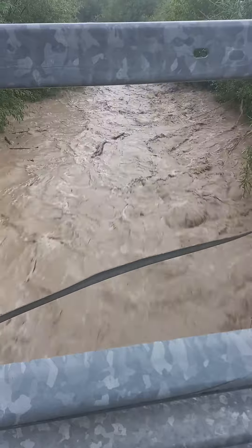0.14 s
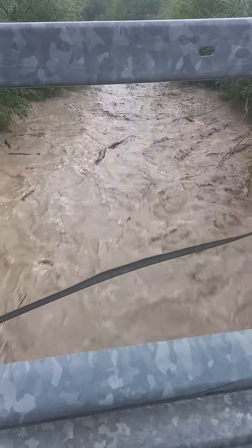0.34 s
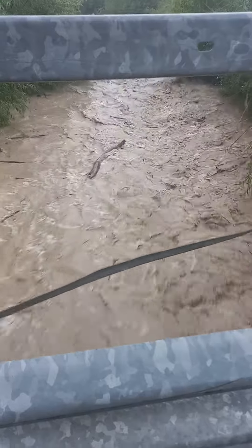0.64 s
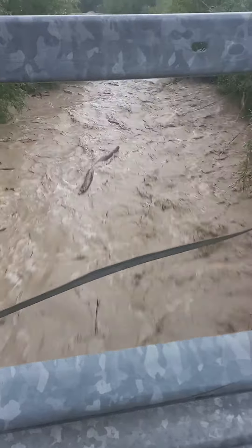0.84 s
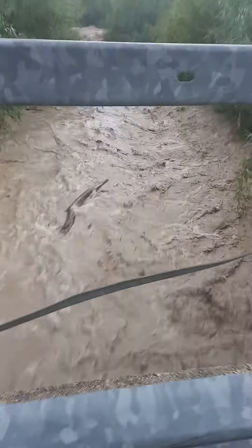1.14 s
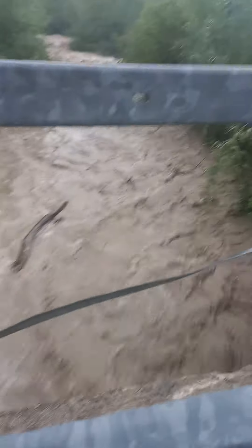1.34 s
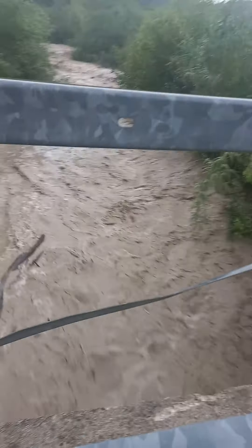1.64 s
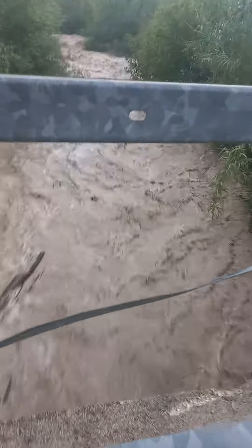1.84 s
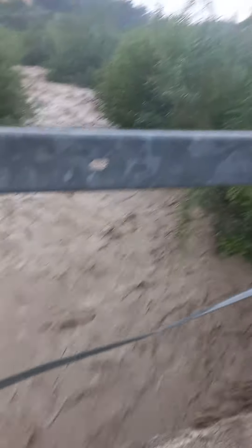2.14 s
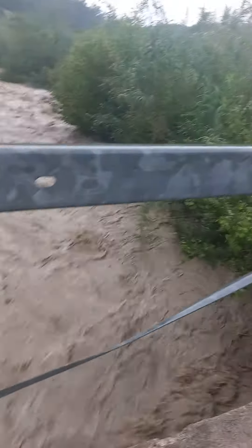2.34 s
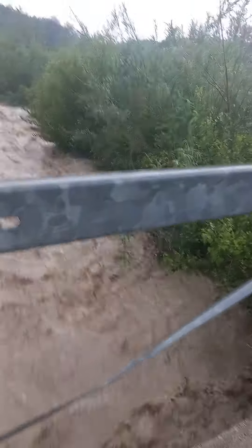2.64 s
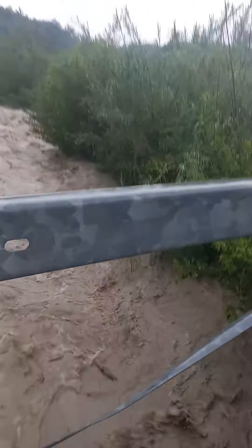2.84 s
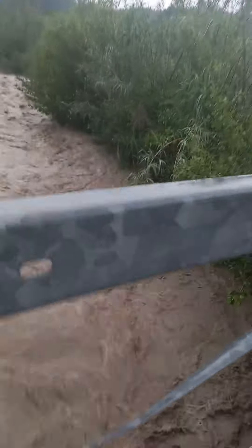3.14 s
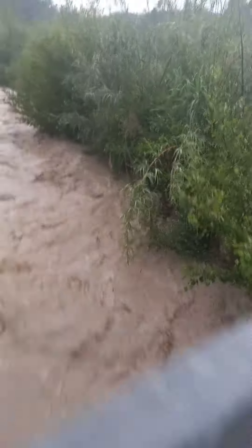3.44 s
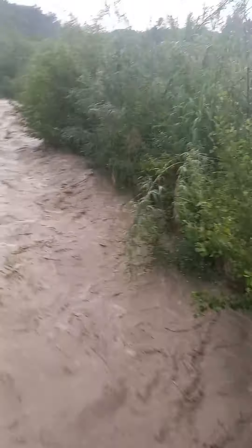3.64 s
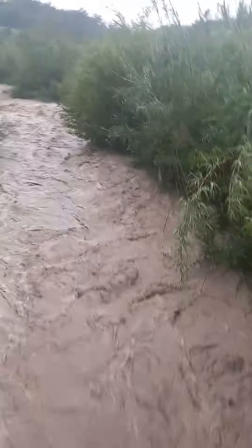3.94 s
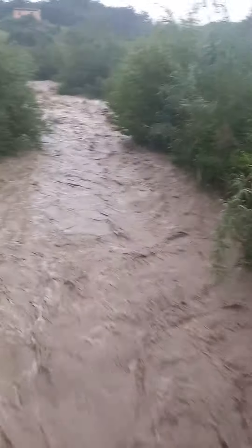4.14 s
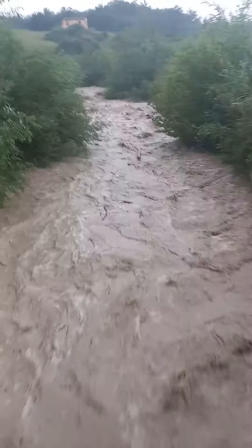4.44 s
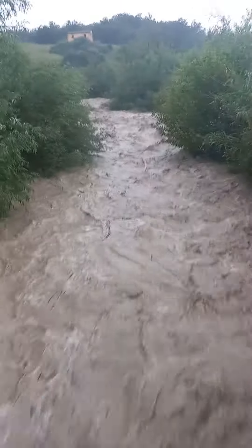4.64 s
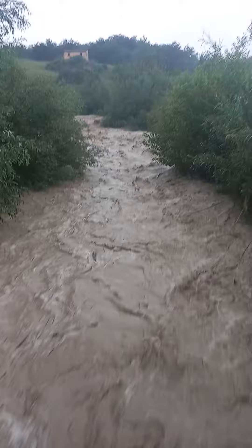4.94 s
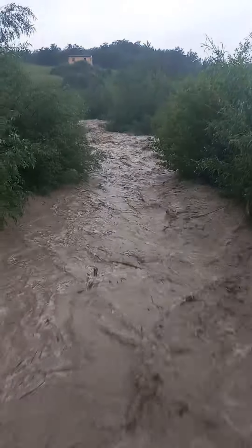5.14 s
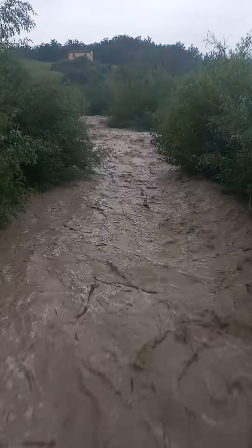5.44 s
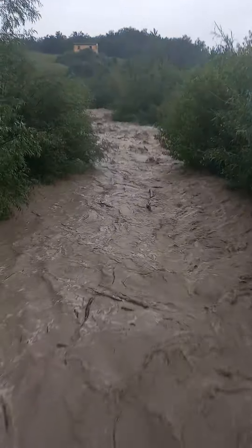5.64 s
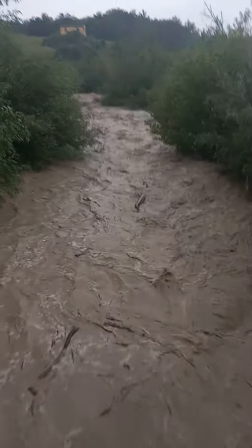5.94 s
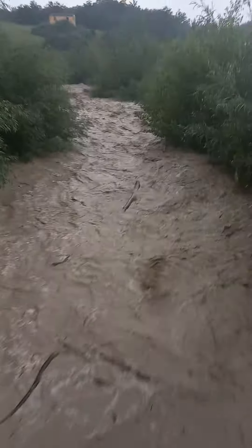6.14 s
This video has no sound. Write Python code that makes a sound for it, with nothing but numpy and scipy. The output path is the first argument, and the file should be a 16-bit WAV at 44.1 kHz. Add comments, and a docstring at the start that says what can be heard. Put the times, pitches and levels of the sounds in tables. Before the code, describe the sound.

A muddy torrent roars under a bridge for the whole six seconds or so, heard on a hand-held stereo microphone. A deep rumble and hollow churning sit in the centre, dotted with irregular dull thumps from stones and plunging water. Above them spreads the wide, bubbly splash of breaking crests, with a thin high hiss. A tiny, sharp, close tick comes at about 0.8 seconds, and a brief gush of spray on the right at 1.3. The splashing swells gradually until 3 seconds and stays full. From about 2.2 to 4.6 seconds the hollow tone of the roar shifts subtly as the microphone rises clear of the railing. A lower tick sounds at 4.9 seconds and a weaker gush at 5.4. The thumps cluster in the first second, around 3 to 4 seconds and again after 5. The water is still roaring at the end.

```python
"""A muddy torrent roars under a bridge, heard on a hand-held microphone pair. From the start, air pockets
and stones rumble and thump under the splash of breaking crests and a thin top hiss. A close tick at 0.8 s,
a gush of spray on the right at 1.3 s. The pair rises and turns; the splash swells until 3 s.
From 2.2 to 4.6 s the pair clears the rail and the roar's hollow resonances shift.
A lower tick follows at 4.9 s, a weaker gush at 5.4 s."""
import sys
import numpy as np
from scipy import signal
from scipy.fft import rfft, irfft
from scipy.io import wavfile
from scipy.ndimage import uniform_filter1d, minimum_filter1d

SR = 44100
rng = np.random.default_rng(int(sys.argv[2]) if len(sys.argv) > 2 else 0)


def transcribe(u):
    """Save the signal u as a 16-bit wav file named by the first command-line argument.

    u: samples, shape (n,) or (channels, n), limited to [-1, 1]; the rate is SR.
    q: integer samples, one column per channel.
    """
    v = np.clip(np.atleast_2d(u).T, -1, 1)
    q = np.round(v * 32767).astype(np.int16)
    wavfile.write(sys.argv[1], SR, q)


N = 277653

# Top hiss: t/s, level/dB, pan/dB (pan = left minus right throughout)
HISS_LEVELS = [(0, -50, 1.5), (.45, -49, 4), (.75, -44.5, -1.5), (1.05, -47.5, 3), (1.4, -49, 3),
               (1.6, -46, 7), (2.2, -47.5, 5), (2.4, -44.5, 1), (2.7, -44.5, 1), (3.1, -42, 1),
               (3.52, -43.5, -5), (3.7, -44, -1), (3.95, -42, -1.5), (4.3, -43, 0), (4.6, -43.5, 0),
               (4.95, -47.5, -1), (5.3, -46, -3.5), (5.75, -44.5, -1.5), (6.3, -44, 7.5)]
# Close ticks: t/s, peak/dB, low f/Hz, high f/Hz, decay/s, pan/dB
TICKS = [(.7764, -19, 14000, 16500, .0008, -4), (.7745, -34, 7600, 13500, .003, 0),
         (4.8605, -15, 2500, 3900, .0045, 0)]
# Spray gushes: t/s, level/dB, half width/s, pan/dB
GUSHES = [(1.344, -33, 0.042, -12), (5.443, -41, 0.039, -2)]
# Splash as the pair rises and turns: t/s, level/dB, pan/dB
SPLASH_LEVELS = [(0, -27, 2), (.88, -25, 2.5), (1.2, -25.5, 1.5), (1.45, -24.5, 0.5), (1.65, -23.5, 0),
                 (1.9, -23.5, 0), (2.25, -24, -.5), (2.5, -22.5, -1), (2.75, -22, -1), (2.95, -20.5, -0.5),
                 (3.2, -20.5, -1), (3.6, -22, -2), (4.0, -21.5, -.5), (4.7, -23, -1), (5.35, -22.5, -1.2),
                 (5.5, -21.5, 0), (5.82, -21.5, -0.5), (6.0, -22, -1.7), (6.3, -20.5, 0.5)]
# Splash brightness: t/s, tilt/(dB/octave)
SPLASH_TILT = [(0, -0.5), (.9, -0.5), (1.5, -0.6), (2.1, 0.2), (2.8, 0.35), (3.35, -0.04), (4.0, 0),
               (4.4, 0.8), (5.0, -0.3), (6.3, 0.2)]
# Thumps from the bed: t/s, peak/dB, f/Hz, length/s
THUMPS = [(0.068, -9, 171, 0.018), (0.237, -7.5, 157, 0.0054), (0.306, -6.5, 156, 0.016),
          (0.364, -9.5, 205, 0.011), (0.497, -10, 165, 0.012), (0.519, -6, 293, 0.0061),
          (0.54, -14, 150, 0.016), (0.723, -6.5, 133, 0.007), (0.862, -7, 258, 0.0086),
          (0.913, -13, 250, 0.0067), (0.93, -13, 140, 0.014), (0.99, -15, 150, 0.024),
          (1.027, -10.5, 125, 0.018), (1.239, -6, 150, 0.0078), (1.375, -20, 95.5, 0.025),
          (1.981, -21, 95, 0.03), (2.125, -8, 190, 0.011), (2.253, -19.5, 84, 0.037),
          (2.493, -13, 181, 0.017), (2.69, -18, 85, 0.044), (3.085, -17, 200, 0.0099),
          (3.114, -14, 327, 0.012), (3.136, -8.5, 253, 0.017), (3.303, -15, 253, 0.028),
          (3.326, -13, 235, 0.014), (3.335, -7.5, 143, 0.0086), (3.41, -10, 124, 0.015),
          (3.457, -9.5, 190, 0.0064), (3.53, -13, 245, 0.027), (3.566, -6, 127, 0.013),
          (3.562, -14, 275, 0.012), (3.605, -14.5, 290, 0.012), (3.736, -11, 374, 0.007),
          (3.87, -12.5, 260, 0.0062), (3.926, -13, 396, 0.0063), (4.087, -5.5, 208, 0.0058),
          (4.29, -19, 97, 0.03), (4.607, -12.5, 403, 0.0081), (4.732, -13.5, 156, 0.017),
          (4.956, -15.5, 98, 0.033), (5.017, -8, 310, 0.0053), (5.019, -15, 240, 0.016),
          (5.051, -12.5, 360, 0.009), (5.089, -14, 290, 0.02), (5.27, -10.5, 246, 0.018),
          (5.3, -17, 94.5, 0.028), (5.354, -13, 285, 0.017), (5.405, -15, 272, 0.013),
          (5.422, -8.5, 255, 0.011), (5.436, -14.5, 140, 0.014), (5.44, -6.5, 292, 0.0052),
          (5.779, -16, 264, 0.017), (6.122, -10.5, 103, 0.02), (6.125, -16, 322, 0.015),
          (6.166, -13.5, 91.6, 0.046), (6.222, -12.5, 337, 0.015)]
# Heave of the deep water: t/s, rumble level/dB, churn level/dB
DEEP_LEVELS = [(0, -18.5, -22), (.15, -19.5, -21.5), (.3, -23, -21), (.52, -22.5, -20), (.68, -25, -21),
               (.87, -22, -20), (1.08, -23.5, -21.5), (1.45, -21.5, -19), (1.7, -23, -20),
               (2.1, -21.5, -19.5), (2.55, -23, -20.5), (2.75, -23.5, -20.5), (3.0, -20.5, -19.5),
               (3.22, -21.5, -19.5), (3.35, -21, -17.5), (3.48, -22, -20), (3.58, -22, -20.5),
               (3.8, -22, -18.5), (4.1, -22.5, -19.5), (4.4, -21, -19.5), (4.7, -20.5, -19.5),
               (4.9, -20.5, -16), (5.02, -20.5, -19), (5.16, -20.5, -19), (5.33, -20, -20),
               (5.43, -18.5, -18), (5.56, -22, -19.5), (5.77, -18, -17.5), (5.98, -22, -19),
               (6.3, -22.5, -17.5)]
# Deep water, left-right likeness: f/Hz, coherence/1
DEEP_COHERENCE = [(30, .85), (70, 0.96), (130, 1), (290, 0.79), (500, 0.8), (700, 0.79), (1000, 0.64)]
# Churn position: t/s, pan/dB
CHURN_PAN = [(0, -1.5), (.5, -1.5), (1, 0), (2, -1), (6.3, -1)]
# Water noise spectra: f/Hz, relative density/dB
HISS_SPECTRUM = [(7000, -90), (8300, -40), (8900, -17), (9900, -11), (12500, -9.5), (13850, -13),
                 (14300, -6), (14900, -1), (16000, 0), (16600, -60)]
SPRAY_SPECTRUM = [(300, -76), (800, -32), (2200, 7), (4000, -6), (6500, 9), (7300, -26), (8000, -28),
                  (10000, -15), (13500, -8), (15000, 6), (16500, -12)]
SPLASH_SPECTRUM = [(150, -63), (400, -32), (750, 0.5), (1200, -3.5), (1600, -3.5), (2250, -4.5),
                   (2700, -10), (3300, -11), (5000, -12.5), (6550, -10.5), (6900, -17), (7300, -30.5),
                   (7800, -67), (9000, -110)]
CHURN_SPECTRUM = [(60, -74), (120, -37), (190, -4.5), (260, -1), (330, -3), (450, -5.5), (600, -9.5),
                  (680, -11), (760, -17.5), (1300, -60), (3000, -100)]
RUMBLE_SPECTRUM = [(20, -5.5), (84, 0), (110, 2.5), (160, 1.5), (220, -8.5), (320, -36), (600, -88)]
# Turn of the pair: t/s, left port lag/ms, splash coherence/1
MIC_TURN = [(0, 0, .1), (1.6, 0, .1), (2.2, .05, .1), (2.7, .26, .4), (3.5, .32, .3), (4.5, .25, .2),
            (6.3, .25, .18)]
# Hollow resonances at the rail: f/Hz, half width/Hz, gain behind/dB, gain clear/dB
RAIL_RESONANCES = [(280, 73, 0, 0.5), (390, 50, -0.5, 0), (560, 108, 3, -2), (2500, 360, 0.4, -0.3)]
# Port resonances: f/Hz, half width/Hz, gain before opening/dB, gain after/dB
LEFT_PORT = [(2030, 550, -0.64, -1), (4500, 1100, -0.034, 0.9)]
RIGHT_PORT = [(2160, 400, -1.8, 2.5), (3860, 430, 0.5, 1), (6300, 510, 1.5, -0.2), (11100, 2400, 2, -1),
              (15000, 1000, -1, 1)]
# Microphone low end: f/Hz, gain/dB
BASS_RESPONSE = [(20, -38), (32, -32), (50, -14), (62, -15), (72, -1), (84, 6), (97, -0.5), (130, 1.5)]

RAIL_CLEAR_START_S, RAIL_CLEAR_SPAN_S = 2.22, 2.35
RUMBLE_TILT_DB_OCT, CHURN_TILT_DB_OCT = (1, -2), (0, 2)  # each: behind the rail, clear of it
PORT_OPEN_START_S, PORT_OPEN_SPAN_S = 1.3, .3
NOTCH_HZ, NOTCH_HALF_WIDTH_HZ, NOTCH_DEPTH = 1806, 31, 0.53
LOWPASS_HZ = 15780
TIME_S, BINS_HZ = np.arange(N) / SR, np.fft.rfftfreq(N, 1 / SR)


def gain(db):
    return 10 ** (np.asarray(db) / 20)


def stereo_gain(db, pan_db):
    return gain([db + pan_db / 2, db - pan_db / 2])


def unit_rms(x):
    return x / np.sqrt(np.mean(x ** 2) + 1e-20)


def at_freq(table, hz):
    f, value = np.transpose(table)
    return np.interp(np.log(hz + 1), np.log(f + 1), value)


def at_time(table, t):
    times_s, *columns = np.transpose(table)
    return [np.interp(t, times_s, column) for column in columns]


def stft_grid(n_fft):
    """Bin f/Hz (column), frame t/s (row)."""
    return np.fft.rfftfreq(n_fft, 1 / SR)[:, None], np.arange(4 * N // n_fft + 5) * n_fft / 4 / SR


def water_noise(spectrum, coherence, patch_db, flicker_db, n_fft, tilt_db_oct=0):
    """Stereo noise, rms 1: drifting louder patches, all-band flicker, lag between the ports."""
    hz, t = stft_grid(n_fft)
    re1, im1, re2, im2, patches = rng.standard_normal((len(t), len(hz), 5)).T
    patches = uniform_filter1d(patches, size=5, axis=0)
    patches = unit_rms(uniform_filter1d(patches, size=6, axis=1))
    flicker = unit_rms(uniform_filter1d(rng.standard_normal(len(t)), size=3))
    lead = np.exp(2j * np.pi * hz * at_time(MIC_TURN, t)[0] / 1000)
    left, diffuse = re1 + 1j * im1, re2 + 1j * im2
    right = coherence * left * lead + np.sqrt(1 - coherence ** 2) * diffuse
    colour = gain(at_freq(spectrum, hz) + tilt_db_oct * np.log2((hz + 1) / 2500))
    colour /= np.sqrt((colour ** 2).mean(0))  # tilt leaves the level unchanged
    frames = np.array([left, right]) * colour * gain(patch_db * patches + flicker_db * flicker)
    return unit_rms(signal.istft(frames, nperseg=n_fft, noverlap=3 * n_fft // 4)[1][:, :N])


def resonate(sound, resonances, start_s, span_s):
    """Gaussian bands, each gliding from a first gain to a second."""
    spectrum, change = rfft(sound), 0
    progress = np.clip((TIME_S - start_s) / span_s, 0, 1)
    for hz, half_width_hz, first_db, last_db in resonances:
        band = irfft(spectrum * np.exp(-((BINS_HZ - hz) / half_width_hz) ** 2), N)
        change += (gain(first_db + (last_db - first_db) * progress) - 1) * band
    return sound + change


def top_hiss():
    """Thin hiss at the very top, independent left and right."""
    hiss = water_noise(HISS_SPECTRUM, coherence=0, patch_db=1.2, flicker_db=.8, n_fft=512)
    return stereo_gain(*at_time(HISS_LEVELS, TIME_S)) * hiss


def ticks():
    """Band-passed noise bursts that die at once."""
    out = np.zeros((2, N))
    for onset_s, peak_db, low_hz, high_hz, decay_s, pan_db in TICKS:
        burst = rng.standard_normal((2, N)) * (TIME_S > onset_s) * np.exp(-abs(TIME_S - onset_s) / decay_s)
        band = signal.sosfilt(signal.butter(4, [low_hz, high_hz], "band", fs=SR, output="sos"), burst)
        out += stereo_gain(peak_db, pan_db)[:, None] * band / abs(band).max(1, keepdims=True)
    return out


def gushes():
    """Brief bright swishes of spray."""
    swell = sum(stereo_gain(db, pan_db)[:, None] * np.exp(-abs((TIME_S - centre_s) / half_width_s) ** 3.1)
                for centre_s, db, half_width_s, pan_db in GUSHES)
    return swell * water_noise(SPRAY_SPECTRUM, coherence=.1, patch_db=1.5, flicker_db=1.5, n_fft=256)


def bubbles(rate_per_s, low_hz, high_hz, decay_cycles, spread_db, pitches):
    """Short ringing bubbles of random pitch and strength, scattered left and right."""
    strength = gain(-spread_db * np.minimum(rng.exponential(1, N), 5))
    impulses = strength * (rng.random(N) < rate_per_s / SR)
    voice = rng.integers(0, 2 * pitches, N)  # one per side and pitch
    out = np.zeros((2, N))
    for k, hz in enumerate(np.tile(np.geomspace(low_hz, high_hz, pitches), 2)):
        cycles = np.arange(round(4 * decay_cycles * SR / hz)) * hz / SR
        envelope = (1 - np.exp(-cycles * 0.56)) * np.exp(-cycles / decay_cycles)
        chirp = np.sin(2 * np.pi * (cycles + 0.014 * cycles ** 2))
        ring = gain(at_freq(SPLASH_SPECTRUM, hz)) * envelope * chirp
        out[k // pitches] += signal.oaconvolve(impulses * (voice == k), ring)[:N]
    return unit_rms(out + 0.28 * out[::-1])


def white_water():
    """Breaking crests: wide splash plus nearer bubbles, louder once the rail stops screening them."""
    _, t = stft_grid(512)
    wash = water_noise(SPLASH_SPECTRUM, coherence=at_time(MIC_TURN, t)[1], patch_db=1.16, flicker_db=0.5,
                       n_fft=512, tilt_db_oct=at_time(SPLASH_TILT, t)[0])
    near = bubbles(rate_per_s=1500, low_hz=883, high_hz=5400, decay_cycles=3.3, spread_db=1, pitches=20)
    return stereo_gain(*at_time(SPLASH_LEVELS, TIME_S)) * (wash + gain(-14.5) * near)


def thumps():
    """Stones and plunging water: a few soft cycles each, rising in pitch like a trapped air pocket."""
    out = np.zeros(N)
    for centre_s, peak_db, hz, length_s in THUMPS:
        u = (TIME_S - centre_s) / length_s
        cycles = hz * length_s * (u + 0.087 * u ** 2) + rng.random()
        out += gain(peak_db) * np.exp(-2.6 * u ** 2) * np.sin(2 * np.pi * cycles)
    return stereo_gain(0, pan_db=-1.2)[:, None] * out


def deep_water():
    """Big air pockets and rolling stones merge into a near-mono rumble and a hollow churn above it."""
    hz, t = stft_grid(2048)
    coherence = at_freq(DEEP_COHERENCE, hz)
    clearing_s = [RAIL_CLEAR_START_S, RAIL_CLEAR_START_S + RAIL_CLEAR_SPAN_S]
    rumble = water_noise(RUMBLE_SPECTRUM, coherence, patch_db=.6, flicker_db=0, n_fft=2048,
                         tilt_db_oct=np.interp(t, clearing_s, RUMBLE_TILT_DB_OCT))
    churn = water_noise(CHURN_SPECTRUM, coherence, patch_db=0.66, flicker_db=0.35, n_fft=2048,
                        tilt_db_oct=np.interp(t, clearing_s, CHURN_TILT_DB_OCT))
    rumble_db, churn_db = at_time(DEEP_LEVELS, TIME_S)
    churn_pan_db = at_time(CHURN_PAN, TIME_S)[0]
    return stereo_gain(rumble_db, pan_db=-.7) * rumble + stereo_gain(churn_db, churn_pan_db) * churn


def scene():
    """Roar coloured by the rail, plus hiss, spray and ticks."""
    roar = deep_water() + thumps() + white_water()
    roar = resonate(roar, RAIL_RESONANCES, RAIL_CLEAR_START_S, RAIL_CLEAR_SPAN_S)
    return roar + top_hiss() + gushes() + ticks()


def record(dry):
    """Port resonances, bass cut, housing notch, 3 ms limiter at full scale, low-pass."""
    ports = np.array([resonate(side, port, PORT_OPEN_START_S, PORT_OPEN_SPAN_S)
                      for side, port in zip(dry, (LEFT_PORT, RIGHT_PORT))])
    notch = 1 - NOTCH_DEPTH / (1 + ((BINS_HZ - NOTCH_HZ) / NOTCH_HALF_WIDTH_HZ) ** 2)
    heard = irfft(rfft(ports) * gain(at_freq(BASS_RESPONSE, BINS_HZ)) * notch, N)
    local_peak = -minimum_filter1d(-abs(heard).max(0), size=133)
    heard /= uniform_filter1d(np.maximum(local_peak, 1), size=133)
    lowpass = signal.firwin(1023, LOWPASS_HZ, window=("kaiser", 9), fs=SR)
    return signal.oaconvolve(heard, lowpass[None], "same")


dry = scene()
out = record(dry)
transcribe(out)
```